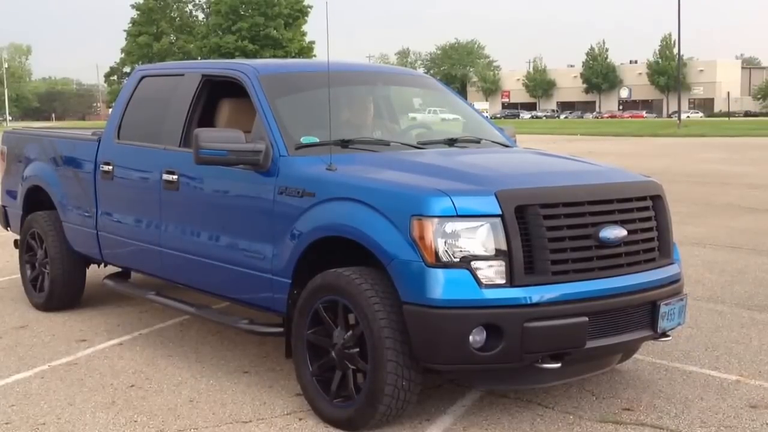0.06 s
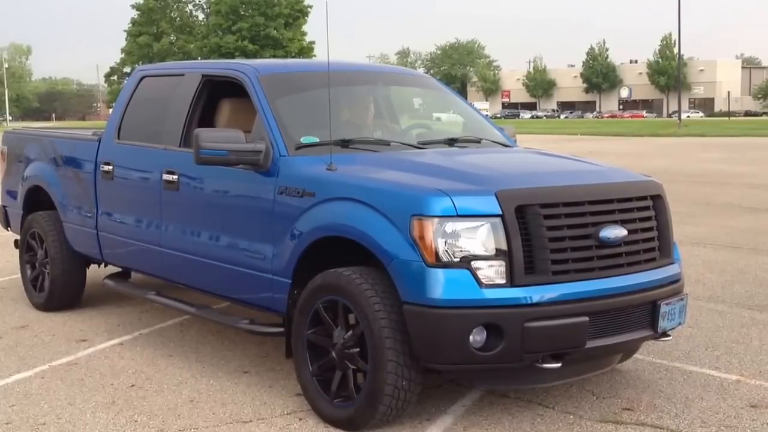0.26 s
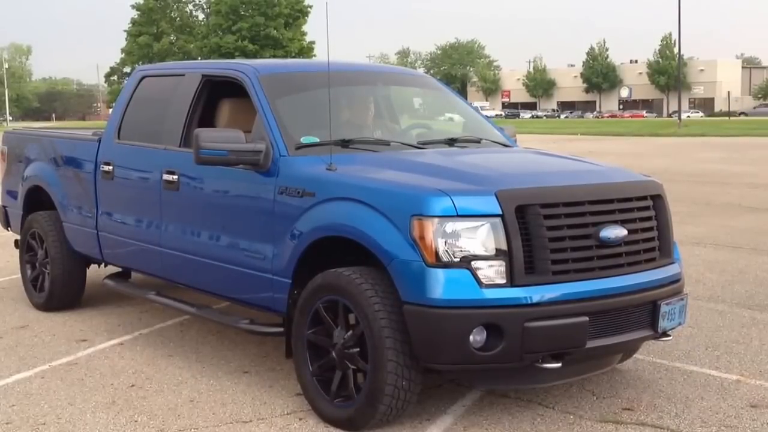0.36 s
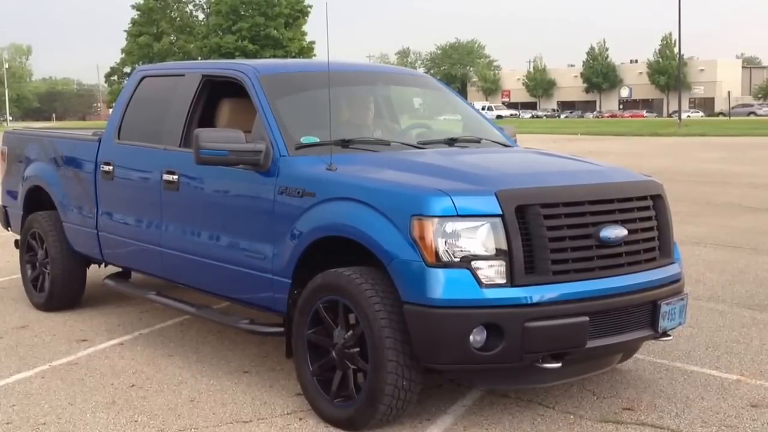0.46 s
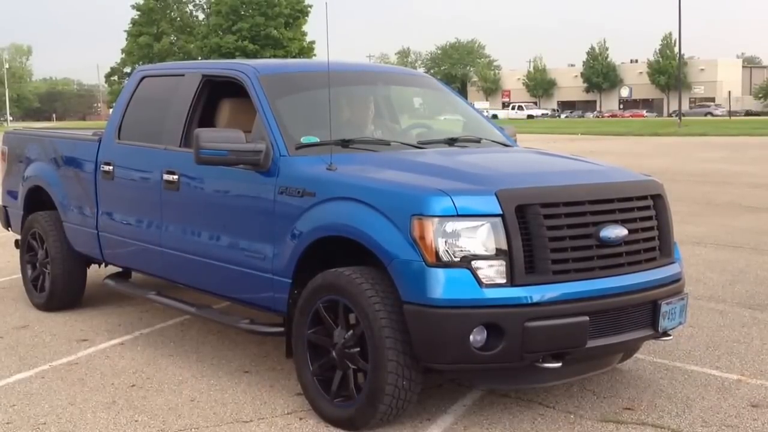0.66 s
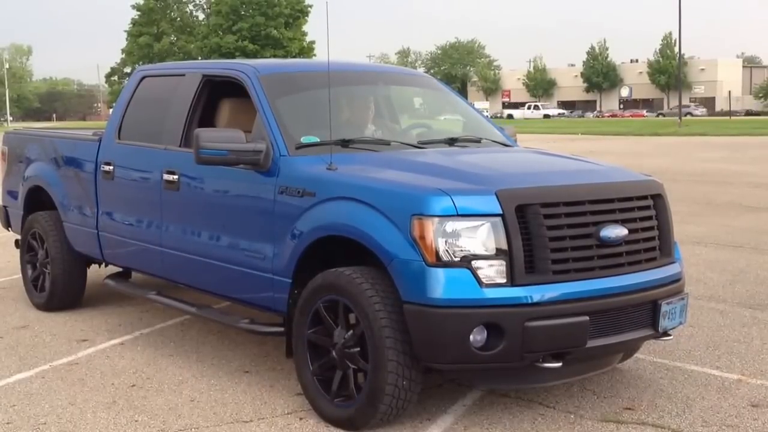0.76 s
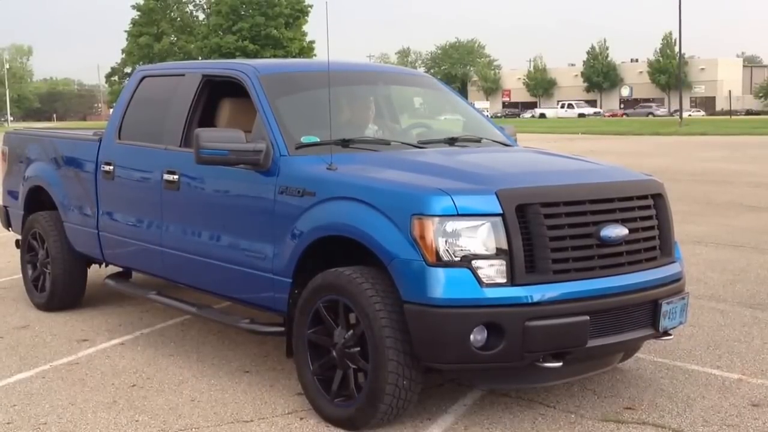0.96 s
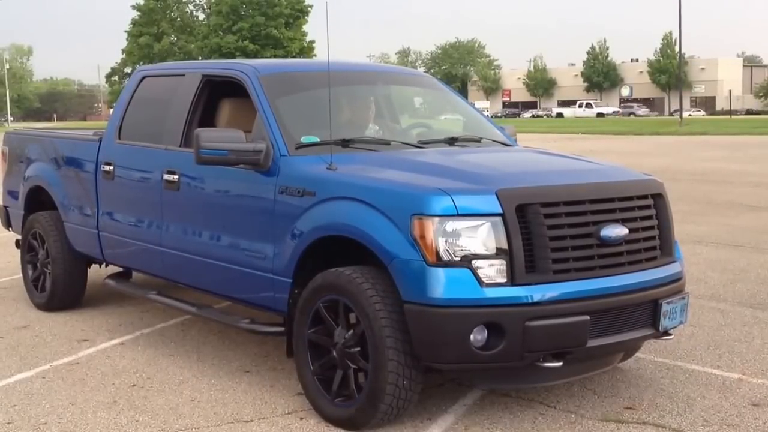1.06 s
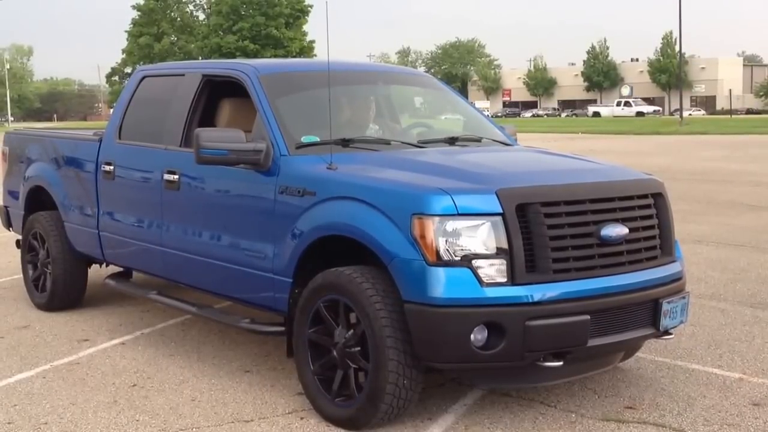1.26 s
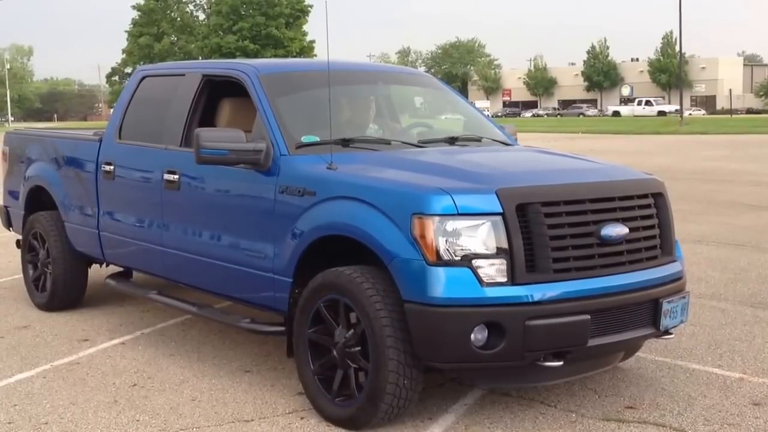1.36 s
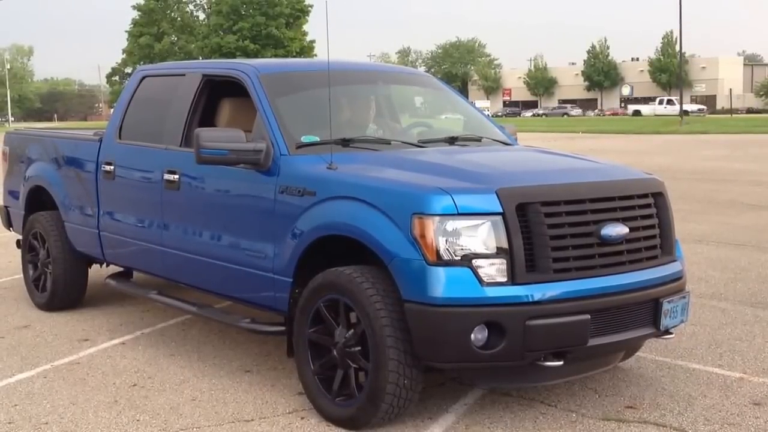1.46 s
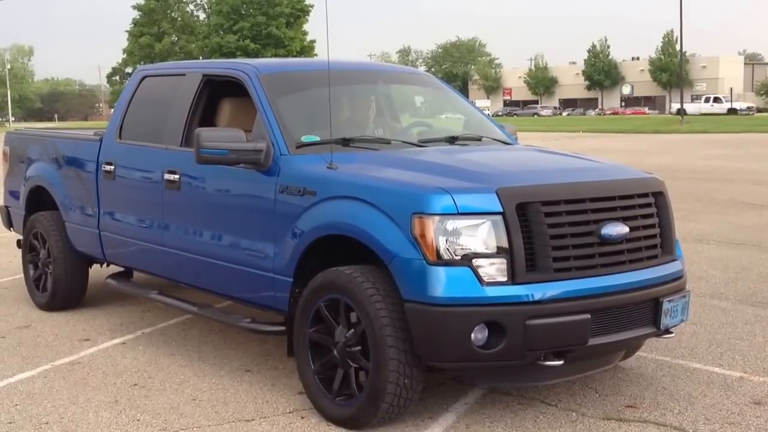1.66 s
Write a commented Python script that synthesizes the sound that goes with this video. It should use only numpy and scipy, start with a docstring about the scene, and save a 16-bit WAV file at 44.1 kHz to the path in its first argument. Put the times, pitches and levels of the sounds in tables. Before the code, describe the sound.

A pickup truck engine revs once, then its turbo valve lets out a sharp hiss.

```python
"""Turbo pickup, one rev

A turbocharged six-cylinder pickup revs once in an open parking lot, a few metres away.
The exhaust booms as its firing harmonics climb through the pipe's pass band. The throttle snaps
shut and the blow-off valve cracks open, venting the boost in a long hiss. Late firings burble
briefly in the pipe, then the engine coasts down with a faint alternator whine."""
import sys
import numpy as np
from scipy.fft import rfft, irfft, next_fast_len
from scipy.io import wavfile
from scipy.ndimage import map_coordinates

SR = 44100
rng = np.random.default_rng(int(sys.argv[2]) if len(sys.argv) > 2 else 0)


def generate_wav(signal):
    """Clip the signal to [-1, 1] and save it as 16-bit WAV at the path in sys.argv[1]."""
    frames = np.transpose(np.atleast_2d(signal))
    scaled = np.clip(frames, -1, 1) * 32767
    pcm = np.round(scaled).astype(np.int16)
    wavfile.write(sys.argv[1], SR, pcm)


N = 74970  # 1.7 s


def amp(db):
    """Decibels to gain."""
    return 10 ** (np.asarray(db) / 20)


def unit_rms(x):
    """Scale to rms 1."""
    return x / np.sqrt(np.mean(x ** 2) + 1e-20)


def db_at(colour, hz):
    """Interpolate (Hz, dB) rows on a log frequency axis."""
    knots_hz, knots_db = np.transpose(colour)
    return np.interp(np.log(hz + 1), np.log(knots_hz + 1), knots_db)


def curve(rows):
    """Interpolate (seconds, value) rows to one value per sample."""
    return np.interp(np.arange(N) / SR, *np.transpose(rows))


def wobble(knots_per_s):
    """A smooth random curve."""
    knots = rng.standard_normal(int(N * knots_per_s / SR) + 4)
    return map_coordinates(knots, [np.arange(N) * knots_per_s / SR])


def filtered(x, response):
    """Apply a gain given as a function of Hz."""
    size = next_fast_len(N + SR // 2)
    return irfft(rfft(x, size) * response(np.fft.rfftfreq(size, 1 / SR)), size)[:N]


def noise(colour):
    """Coloured noise of rms 1."""
    return unit_rms(filtered(rng.standard_normal(N), lambda hz: amp(db_at(colour, hz))))


def partial(cycles, flutter_db, drift_rad):
    """A sine of rms about 1, unsteady in level and phase."""
    level = np.sqrt(2) * amp(flutter_db * wobble(29.74))
    return level * np.sin(2 * np.pi * cycles + drift_rad * wobble(18))


# Turbo shaft whistle. Each row: time in seconds, pitch in Hz, level in dB.
TURBO_WHISTLE = [(0, 2920, -56), (.1, 3020, -57), (.22, 3500, -55), (.33, 4700, -62), (.5, 8600, -65),
                 (.66, 10400, -63), (.74, 12100, -59), (.79, 11450, -58), (.87, 10600, -75)]


def turbo():
    """The compressor's faint, airy whistle climbs with the boost and sinks when the throttle shuts."""
    rows = np.array(TURBO_WHISTLE)
    hz = curve(rows[:, :2]) * (1 + .012 * wobble(250))
    level = amp(curve(rows[:, [0, 2]]))
    return level * partial(np.cumsum(hz) / SR, flutter_db=1, drift_rad=1.4)


# Alternator whine. Each row: time in seconds, level in dB.
WHINE_DB = [(0, -60), (.6, -38), (.9, -36), (1.1, -31), (1.35, -36), (1.48, -39), (1.6, -35.5), (1.7, -39)]
WHINE_ORDER = 14.55  # multiple of the bank rate


def alternator(bank_cycles):
    """A whine geared to the crankshaft, fluttering a little."""
    cycles = WHINE_ORDER * bank_cycles + .05 * wobble(110)
    return amp(curve(WHINE_DB)) * partial(cycles, flutter_db=2.2, drift_rad=.4)


# Combustion rumble. Each row: time in seconds, level in dB.
RUMBLE_DB = [(0, -33), (.13, -29), (.21, -26.5), (.28, -29), (.5, -28), (.74, -27), (.77, -30),
             (1.0, -30.5), (1.3, -30.5), (1.65, -28)]
# Its spectrum. Each row: frequency in Hz, relative level in dB.
RUMBLE_COLOUR = [(25, -13), (55, -29), (80, -17), (120, -2), (190, -3.5), (270, -3), (350, -15),
                 (600, -27.5), (1500, -89)]


def rumble(bank_cycles):
    """Uneven combustion: low noise that swells slightly at each firing, two per bank cycle."""
    pulsing = 1 + .15 * np.cos(4 * np.pi * bank_cycles)
    return amp(curve(RUMBLE_DB)) * unit_rms(noise(RUMBLE_COLOUR) * pulsing)


# Mechanical and intake noise, then turbo rush. Each row: time in seconds, level in dB.
ROAR_DB = [(0, -41.5), (.12, -36.5), (.3, -31), (.36, -29), (.48, -24.5), (.55, -22.5), (.69, -18),
           (.742, -18.5), (.768, -26), (.85, -25), (1.2, -29.5), (1.7, -28.5)]
RUSH_DB = [(0, -86), (.3, -50), (.5, -41), (.69, -64), (.715, -27.5), (.742, -25), (.765, -38.5),
           (.83, -44.5)]
# Their spectra. Each row: frequency in Hz, relative level in dB.
ROAR_COLOUR = [(230, -27), (380, -4.5), (440, -4.5), (500, -1), (590, -0.5), (690, -1), (800, -3.5),
               (930, -7.5), (1250, -5.5), (1600, -7), (1900, -3.5), (2500, -10), (3100, -16.5),
               (3500, -16.5), (4000, -26), (4900, -18), (6000, -19), (7000, -24.5), (8200, -34.5),
               (10000, -41), (13500, -38), (15500, -40)]
RUSH_COLOUR = [(1500, -23), (3000, 3), (4000, -13), (5000, 1.5), (7000, -4), (9000, -12.5), (11000, -21),
               (15000, -24)]


def roar(bank_cycles):
    """Valve train, intake and turbo rush, pulsing with the firings."""
    firing = .11 * np.cos(4 * np.pi * bank_cycles)
    lope = .033 * np.cos(2 * np.pi * bank_cycles)
    flutter = amp(.91 * wobble(120))
    mechanical = amp(curve(ROAR_DB)) * noise(ROAR_COLOUR)
    rush = amp(curve(RUSH_DB)) * noise(RUSH_COLOUR)
    return unit_rms(1 + firing + lope) * flutter * (mechanical + rush)


# Bay and pipework resonances. Each row: centre in Hz, width in Hz, lift in dB.
BAY_RESONANCES = [(590, 40, 3), (677, 35, 3), (821, 25, 3), (1175, 25, 4), (1847, 30, 4), (2007, 40, 3),
                  (2453, 25, 4), (2517, 25, 4), (4808, 45, 2.5), (6103, 25, 4), (6173, 25, 6),
                  (6830, 30, 4)]
# Ground and bodywork reflections. Each row: delay in seconds, signed gain.
REFLECTIONS = [(.0031, 0.077), (.0074, -0.1), (0.0147, 0.14), (.021, 0.13)]


def engine_bay(x):
    """Narrow resonances under the bonnet and near reflections colour the air noise."""
    def response(hz):
        lift_db = sum(db / (1 + (2 * (hz - centre) / width) ** 2) for centre, width, db in BAY_RESONANCES)
        echoes = sum(gain * np.exp(-2j * np.pi * hz * delay_s) for delay_s, gain in REFLECTIONS)
        return amp(lift_db) * (1 + echoes)
    return amp(-1.3) * filtered(x, response)


# Coasting engine. Each row: time in seconds, level in dB.
COAST_DB = [(0, -70), (.7, -63), (.76, -28.5), (1.0, -29.5), (1.1, -27), (1.3, -29.5), (1.5, -32),
            (1.7, -32)]
# Its harmonics. Each row: multiple of the engine cycle rate, relative level in dB.
COAST_ORDERS = [(3, 1), (4, -7), (6, 0.5), (7, -10), (8, -15), (9, -9), (12, -17), (16, -16), (19, -16),
                (21, -13)]


def coasting(bank_cycles):
    """With the throttle shut the cylinders fire unevenly, adding notes between the firing harmonics."""
    engine_cycles = bank_cycles / 3  # three cylinders a bank
    notes = sum(amp(db) * partial(order * engine_cycles, flutter_db=2.5, drift_rad=.25)
                for order, db in COAST_ORDERS)
    return amp(curve(COAST_DB)) * notes


# Late firings. Each row: start in seconds, length in seconds, level in dB, pipe note in Hz.
BURBLES = [(.874, .027, -16, 205), (.92, .03, -19, 150), (.963, .01, -25, 222)]
# Gas puff spectrum. Each row: frequency in Hz, relative level in dB.
PUFF_COLOUR = [(70, -21), (140, -5.5), (200, -1), (265, 0.5), (320, -9), (450, -12), (600, -17.5),
               (800, -34), (1500, -35)]


def burble(rise_s=.006, decay_s=.012, puff_db=-1):
    """Late firings blow the pipe in short bursts, each a low note with a puff of gas."""
    out = np.zeros(N)
    for start_s, length_s, db, hz in BURBLES:
        t = np.arange(N) / SR - start_s
        envelope = np.clip(t / rise_s, 0, 1) * np.exp(-np.maximum(t - length_s, 0) / decay_s)
        note = partial(hz * t, flutter_db=-2, drift_rad=.44)
        puff = amp(puff_db) * noise(PUFF_COLOUR)
        out += amp(db) * envelope * (note + puff)
    return out


def vent(colour, db, delay_s, rise_s, hold_s, fall_db_per_s):
    """Air escaping the open valve: it rises, holds, then falls as the pressure drains."""
    t = np.arange(N) / SR - VALVE_OPENS_S - delay_s
    drained_db = fall_db_per_s * np.maximum(t - rise_s - hold_s, 0)
    flutter_db = .68 * wobble(69.7)
    return np.clip(t / rise_s, 0, 1) * amp(db - drained_db + flutter_db) * noise(colour)


# Blow-off spectra: first crack, full jet, port. Each row: frequency in Hz, relative level in dB.
CRACK_COLOUR = [(2500, -20), (5000, 10.5), (7000, 7.5), (9500, -3.5), (12000, -3.5), (14000, 4),
                (15500, -8)]
JET_COLOUR = [(1500, -23), (3000, -7.5), (3900, -11), (4700, -2.5), (5500, -0.5), (6200, 0), (6900, -2),
              (7500, -11), (9500, -18.5), (13500, -16), (15500, -20)]
PORT_COLOUR = [(250, -52), (450, -15), (620, -0.5), (950, -8.5), (1450, 2.5), (1700, 0), (2050, 6.5),
               (2300, -0.5), (2550, 1.5), (3000, -14), (4500, -12.5), (9000, -45)]
VALVE_OPENS_S = .828


def blow_off():
    """A thin hiss as the valve cracks, then the full jet and the hollow note of its port."""
    crack = vent(CRACK_COLOUR, db=-29.5, delay_s=0, rise_s=.012, hold_s=.11, fall_db_per_s=19)
    jet = vent(JET_COLOUR, db=-20, delay_s=.02, rise_s=.085, hold_s=.03, fall_db_per_s=42)
    port = vent(PORT_COLOUR, db=-21.5, delay_s=.022, rise_s=.045, hold_s=.19, fall_db_per_s=41)
    return crack + jet + port


# Exhaust under throttle. Each row: time in seconds, level in dB.
THROTTLE_DB = [(0, -29), (.2, -24.5), (.3, -23.5), (.4, -19), (.48, -11), (.545, -13.5), (.6, -9),
               (.68, -8.3), (.742, -9), (.757, -56), (.8, -75)]
# Low boom and higher rasp harmonics. Each row: multiple of the bank rate, relative level in dB.
BOOM_ORDERS = [(1, -3.5), (2, 2.5), (3, -5), (4, 1.5), (5, -9), (6, -9)]
RASP_ORDERS = [(7, -29), (8, -31), (9, -33), (10, -33), (11, -25), (12, -44), (13, -29.5), (14, -33)]
# Exhaust pipe response. Each row: frequency in Hz, gain in dB.
PIPE_RESPONSE = [(65, -40), (85, -24), (103, -16), (113, -7.5), (133, -1.5), (200, -3.5), (260, 1.5),
                 (305, -1.5), (335, -8.5), (420, -9), (600, -29), (900, -34)]
FOURTH_FADE_FROM_HZ = 61.4  # bank rate above which the fourth harmonic gives way


def exhaust(bank_hz, bank_cycles):
    """Firing harmonics sweep up through the pipe's pass band while the throttle is open."""
    fourth_fade_db = np.clip(bank_hz - FOURTH_FADE_FROM_HZ, 0, 20)  # 1 dB per Hz
    boom = np.zeros(N)
    for order, db in BOOM_ORDERS:
        level_db = db + db_at(PIPE_RESPONSE, order * bank_hz)
        if order == 4:
            level_db -= fourth_fade_db
        boom += amp(level_db) * partial(order * bank_cycles, flutter_db=.5, drift_rad=.06)
    rasp = sum(amp(db) * partial(order * bank_cycles, flutter_db=4, drift_rad=.49)
               for order, db in RASP_ORDERS)
    return amp(curve(THROTTLE_DB)) * (boom + rasp)


# Engine speed. Each row: time in seconds, firing rate of one cylinder bank in Hz.
BANK_RATE_HZ = [(0, 34), (.15, 35.5), (.25, 41), (.328, 51.9), (.406, 62.2), (.48, 70.6), (.572, 87.2),
                (.642, 97.2), (.696, 102.8), (.745, 106.8), (.79, 105), (.876, 102.3), (1.0, 99.7),
                (1.188, 94.8), (1.35, 90.4), (1.46, 87.3), (1.7, 81.8)]


def scene():
    """One speed curve sets the engine's notes and pulsing; burble, turbo and valve keep their own timings."""
    bank_hz = curve(BANK_RATE_HZ)
    bank_cycles = np.cumsum(bank_hz) / SR
    combustion = exhaust(bank_hz, bank_cycles) + coasting(bank_cycles) + rumble(bank_cycles) + burble()
    whines = alternator(bank_cycles) + turbo()
    air = engine_bay(roar(bank_cycles) + blow_off())
    return (combustion + whines + air)[None]


def record(dry, low_cut_hz=60, ceiling=1.15, top_hz=15500):
    """The microphone loses the deep bass; the highest peaks are rounded and the top treble is cut."""
    x = filtered(dry[0], lambda hz: 1 - 1 / (1 + (hz / low_cut_hz) ** 6))
    rounded = x / (1 + np.abs(x / ceiling) ** 8) ** (1 / 8)
    return filtered(rounded, lambda hz: hz < top_hz)[None]


dry = scene()
out = record(dry)
generate_wav(out)
```